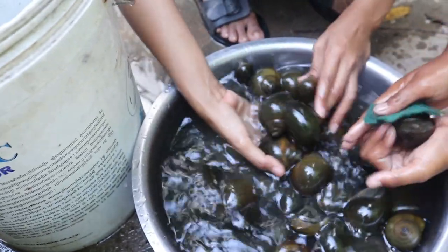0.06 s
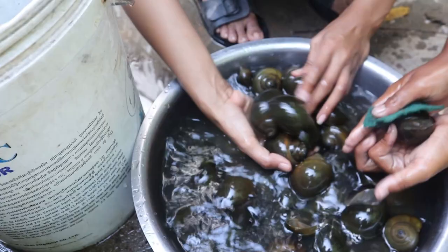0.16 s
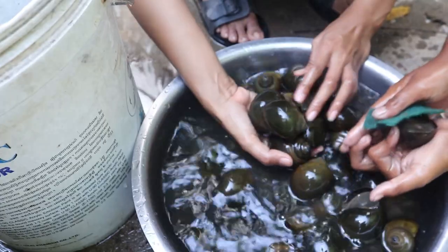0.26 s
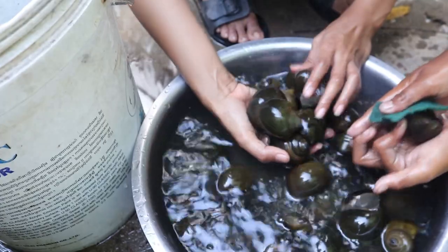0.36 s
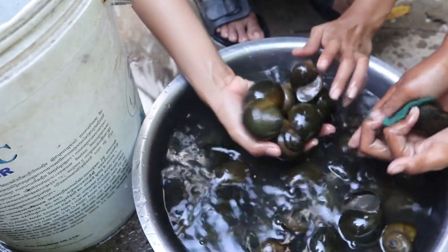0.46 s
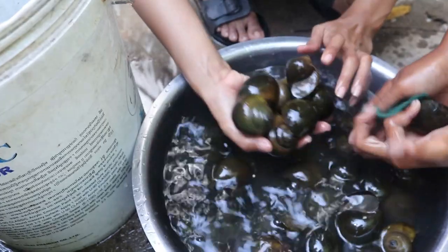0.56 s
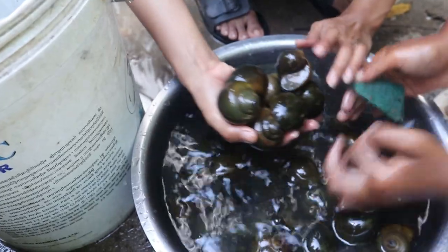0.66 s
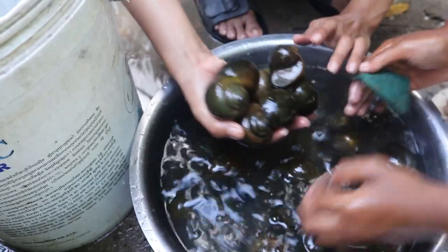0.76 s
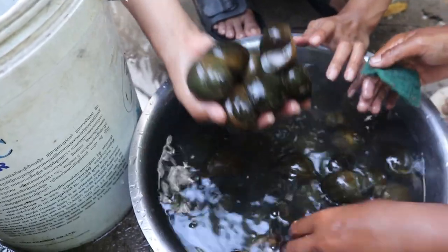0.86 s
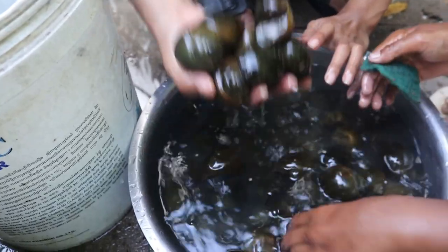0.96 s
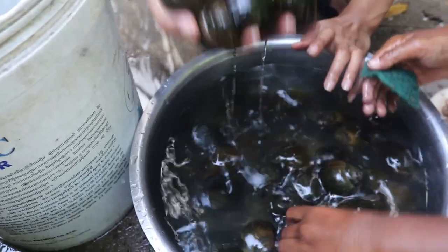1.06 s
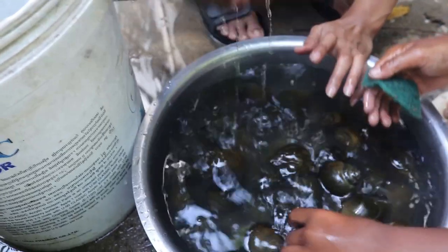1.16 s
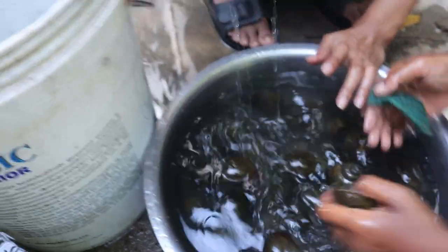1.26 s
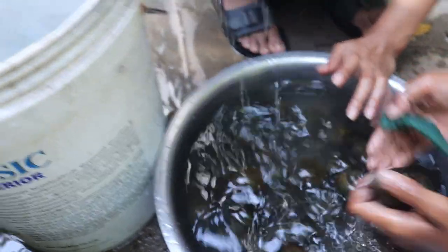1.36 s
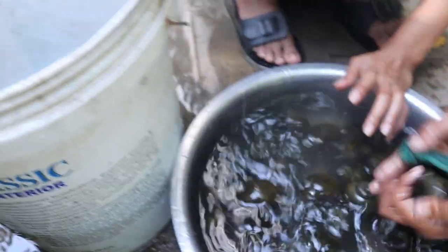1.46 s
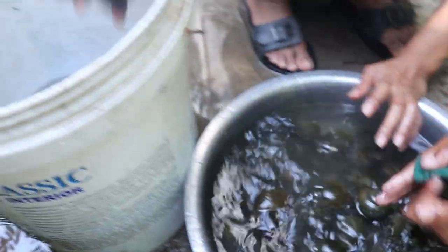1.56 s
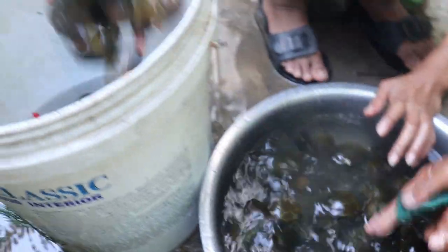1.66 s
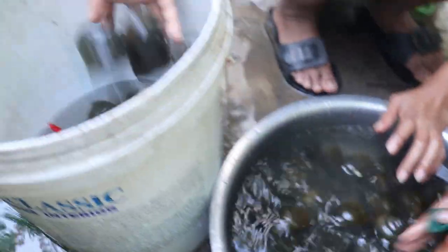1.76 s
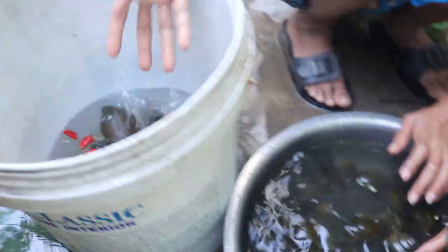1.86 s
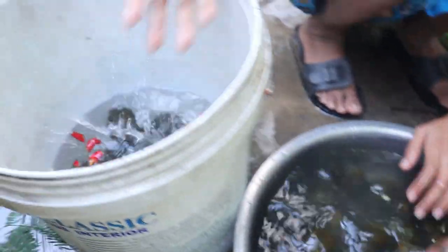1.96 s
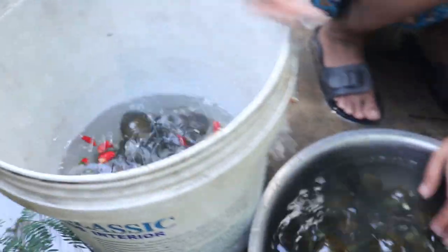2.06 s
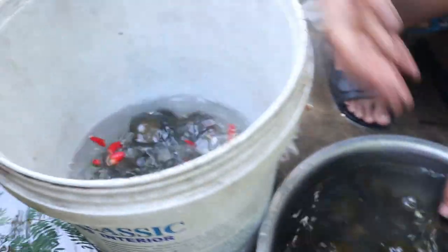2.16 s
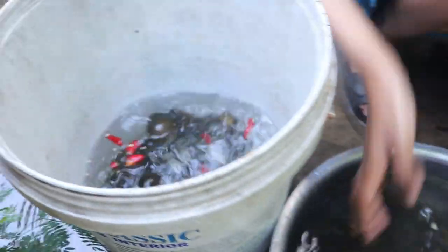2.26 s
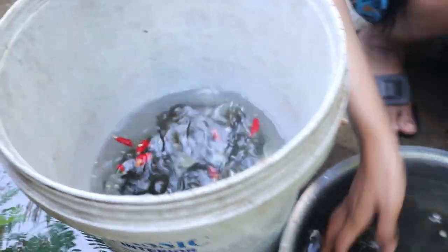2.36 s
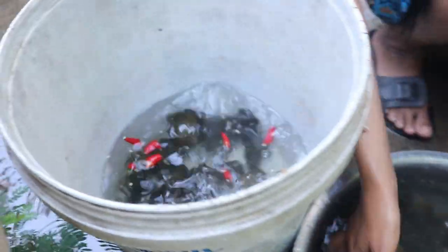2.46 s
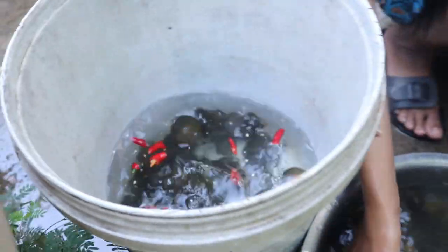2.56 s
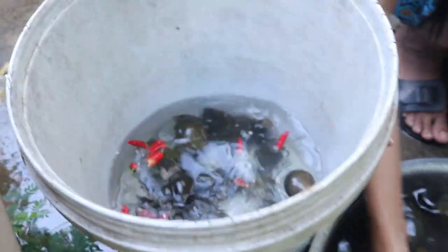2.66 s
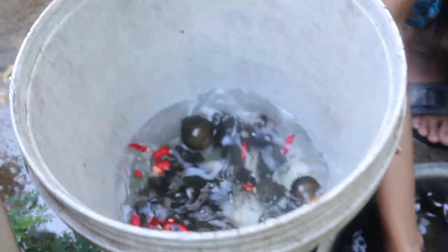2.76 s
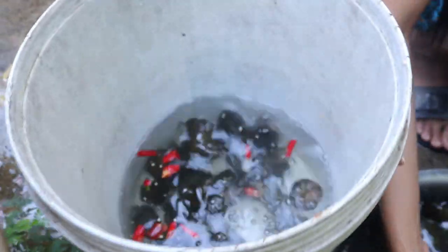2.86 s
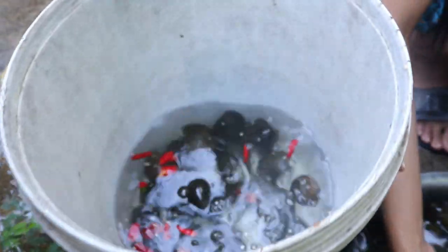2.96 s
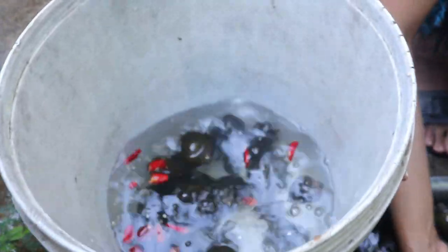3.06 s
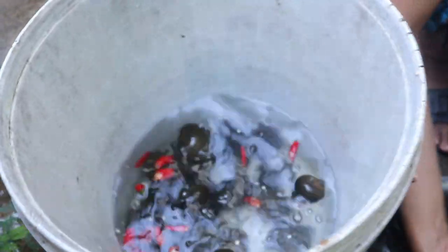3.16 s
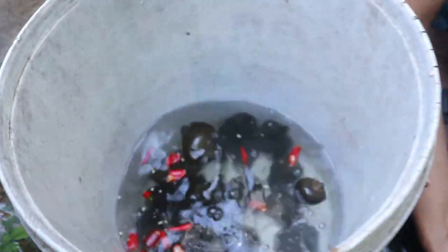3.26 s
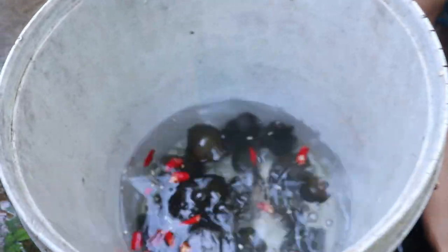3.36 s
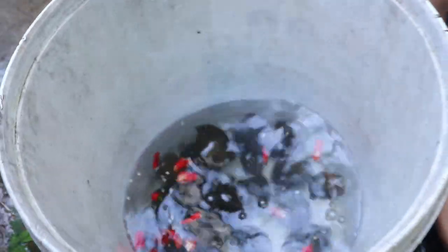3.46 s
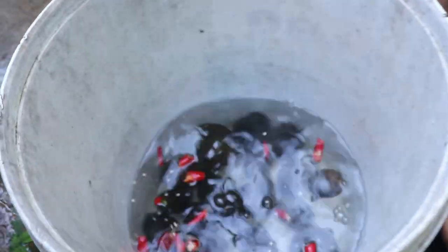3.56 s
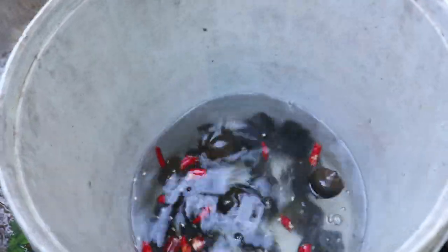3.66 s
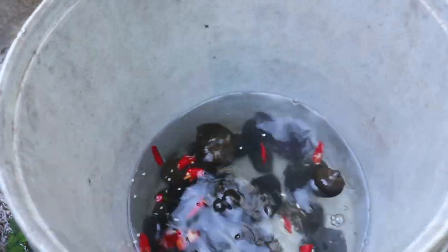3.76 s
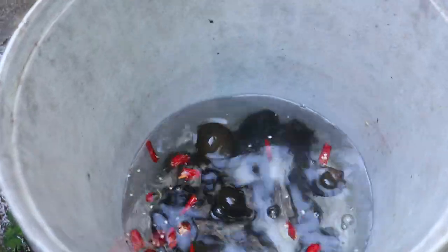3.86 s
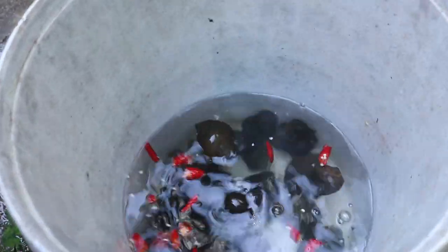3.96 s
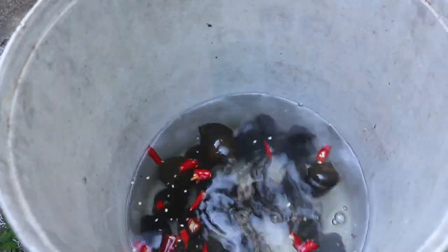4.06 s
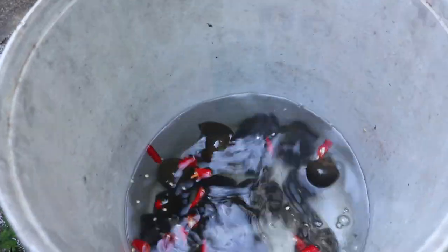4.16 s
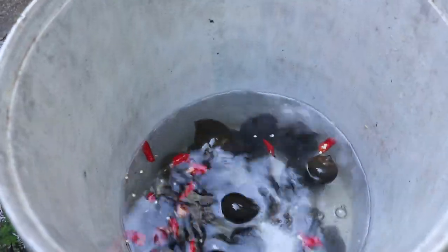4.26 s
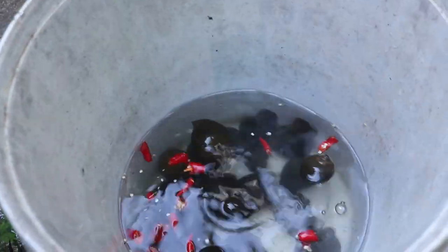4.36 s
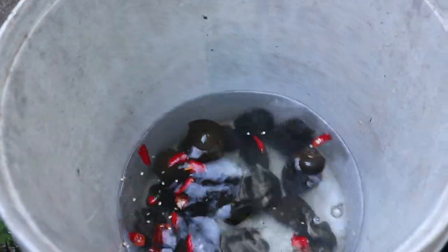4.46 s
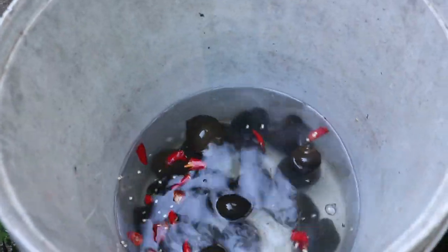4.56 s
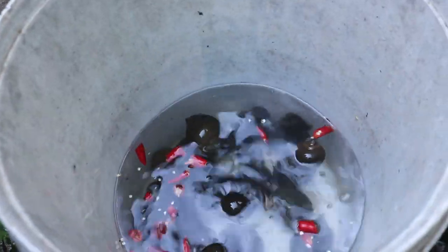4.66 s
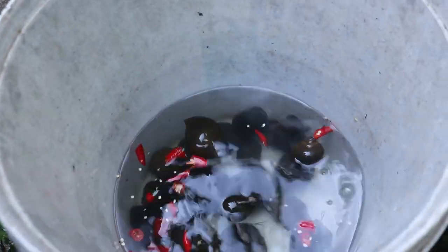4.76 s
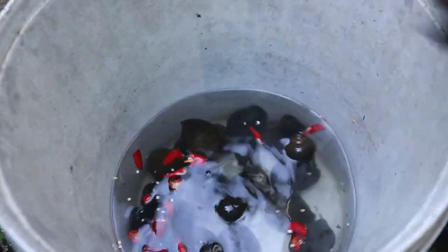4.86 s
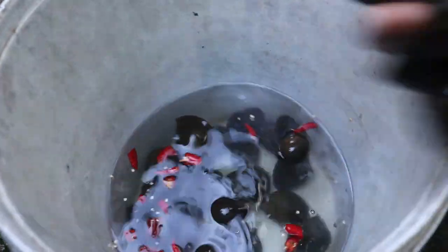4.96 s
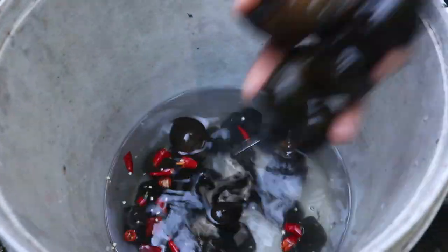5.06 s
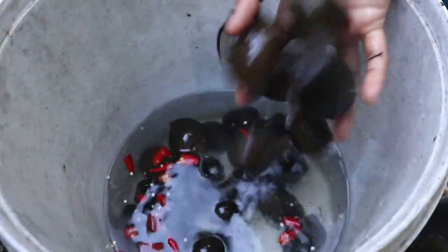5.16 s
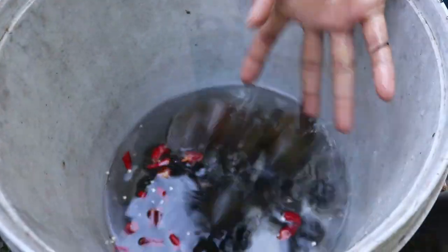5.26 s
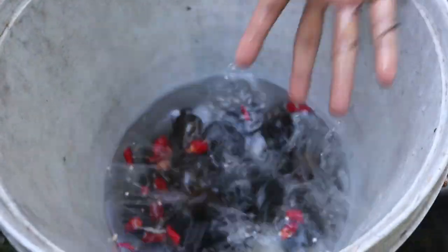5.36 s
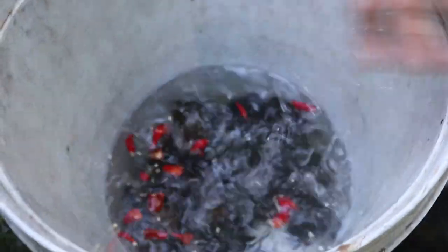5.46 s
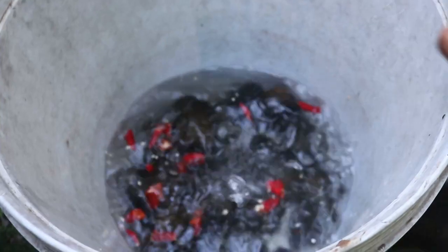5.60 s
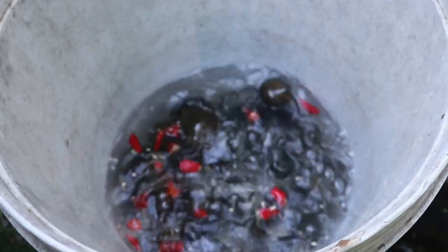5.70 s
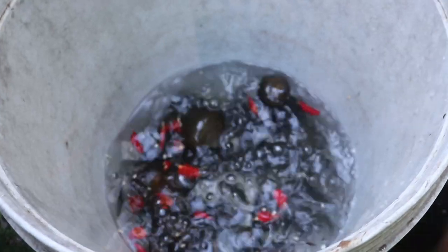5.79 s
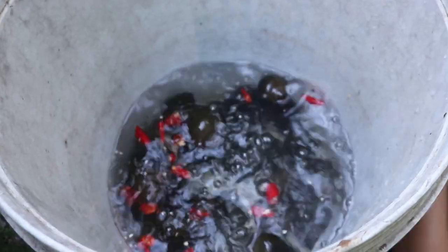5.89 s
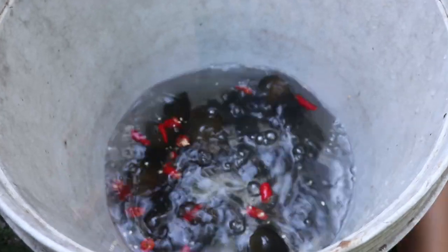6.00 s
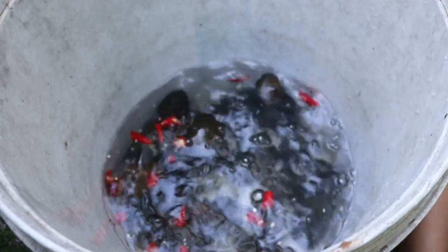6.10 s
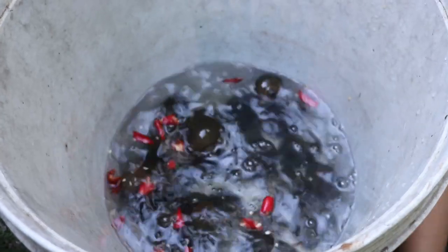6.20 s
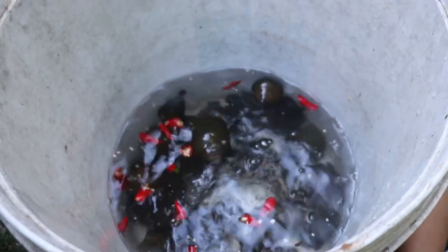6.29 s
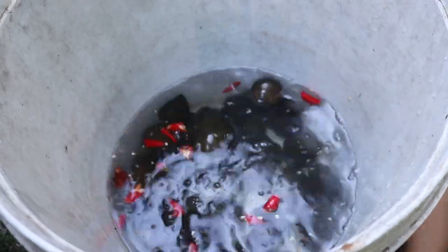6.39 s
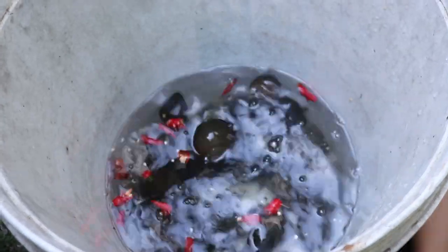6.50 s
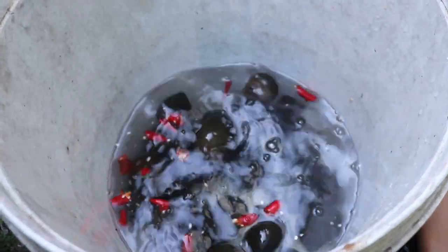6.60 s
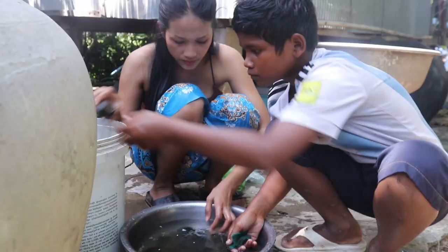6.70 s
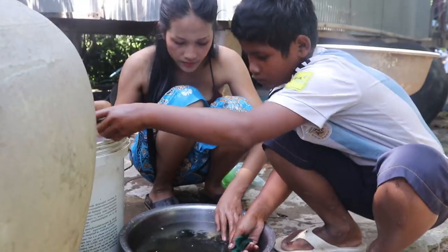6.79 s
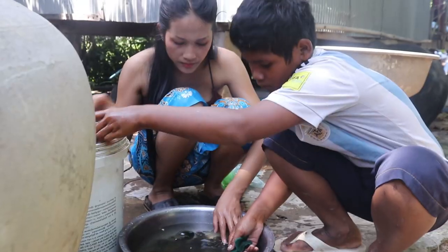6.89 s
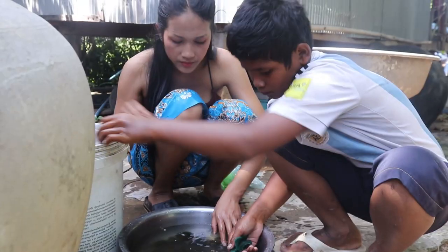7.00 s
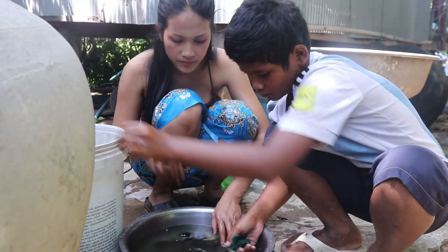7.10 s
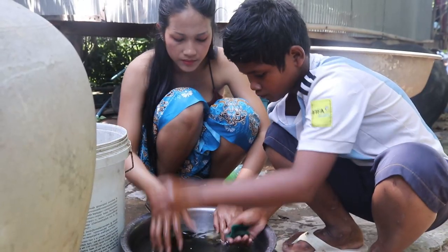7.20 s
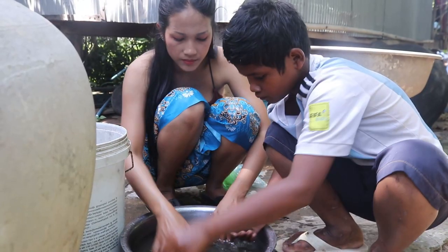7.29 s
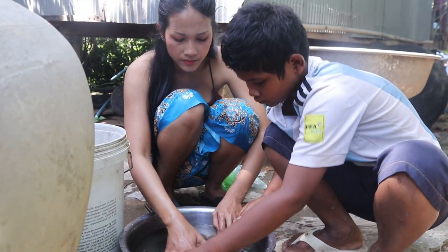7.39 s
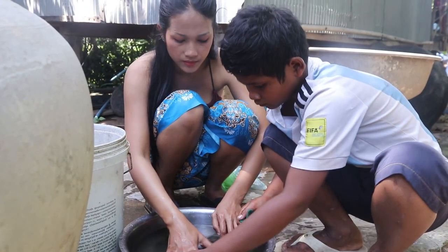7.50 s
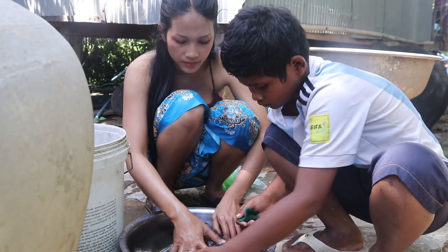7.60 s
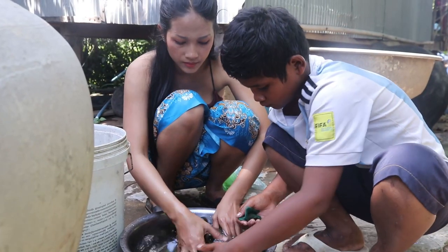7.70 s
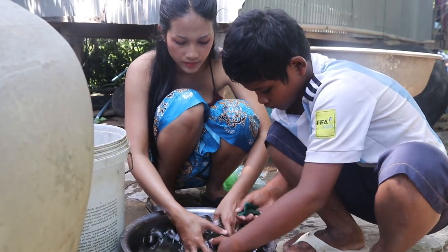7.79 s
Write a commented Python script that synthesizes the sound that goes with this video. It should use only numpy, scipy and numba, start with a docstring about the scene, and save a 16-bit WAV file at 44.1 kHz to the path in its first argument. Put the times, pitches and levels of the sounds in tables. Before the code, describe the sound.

Outdoors, very close, wet snail shells grate and knock in a steel bowl while water sloshes and fizzes. A lifted handful drips, then clatters and splashes into a plastic bucket with a hollow boom. Washing resumes, a second handful plunges in after five seconds, then brief scrubbing, a smaller third drop near seven, and rising grating at the end. Faint low yard rumble lies underneath.

```python
"""Snails are washed by hand in a steel bowl of water, outdoors, close to the microphone.
Shells grind on each other and on the steel, water sloshes and fizzes: showers of tiny damped rings.
Single shells knock: a few short modes over noise bursts. Handfuls dropped into a plastic bucket
splash (bubble and drop rings) and make its air column boom (resonated noise).
Water drains from lifted handfuls, single bubbles chirp, and the yard rumbles faintly."""
import sys
import numpy as np
from scipy import signal
from scipy.fft import rfft, irfft, next_fast_len
from scipy.io import wavfile
from scipy.ndimage import uniform_filter1d, map_coordinates
from numba import njit

SR = 44100
rng = np.random.default_rng(int(sys.argv[2]) if len(sys.argv) > 2 else 0)


def log_audio(samples):
    """Write samples as a 16-bit WAV file to the path given in sys.argv[1]."""
    # one column per channel
    frames = np.atleast_2d(samples).T
    # limit to full scale, then quantise
    limited = np.clip(frames, -1, 1)
    pcm = np.round(limited * 32767).astype(np.int16)
    wavfile.write(sys.argv[1], SR, pcm)


N = 345727
TIME_S = np.arange(N) / SR

# Effort of the hands, one list a bout. Each row: time in seconds, effort in dB before layer trims.
EFFORT_BOUTS = [
    [(0.0, -23), (0.29, -28), (0.36, -30), (0.52, -30.5), (0.62, -28), (0.74, -37.5), (1.2, -32),
     (1.64, -35)],
    [(2.51, -27), (2.72, -24), (3.45, -25.5), (3.9, -28), (4.15, -33.5), (4.5, -35), (4.68, -27),
     (4.88, -37), (5.07, -43.5)],
    [(5.86, -27), (5.98, -37.5), (6.07, -24.5), (6.735, -24)],
    [(6.745, -34.5), (6.85, -36), (6.92, -52.5), (7.07, -49)],
    [(7.425, -31), (7.55, -26.5), (7.84, -18.5)],
]
# Water moved by the hands. Each row: time in seconds, sloshing in dB re effort before layer trims.
WETNESS = [(0.2, -7), (0.65, 3.5), (1.35, 1.5), (2.9, 0.5), (3.45, -1.5), (4.7, 0.5), (6.72, -2.5),
           (6.76, -15), (7.8, -13)]
# Strongest shoves of the pile. Each row: start in seconds, level in dB before layer trims, length in seconds.
SHOVES = [(0.188, -17.5, 0.2), (0.538, -16, 0.058), (0.593, -16, 0.016), (0.65, -14, 0.027),
          (0.954, -19.5, 0.018), (1.225, -17, 0.015), (1.301, -12, 0.03), (1.333, -17.5, 0.022),
          (1.41, -17.5, 0.027), (1.494, -15, 0.052), (2.842, -19.5, 0.031), (3.392, -18, 0.12),
          (3.583, -18, 0.0056), (3.91, -11.5, 0.024), (4.125, -22.5, 0.017), (4.215, -16.5, 0.0081),
          (4.439, -17, 0.03), (4.56, -14, 0.018), (4.625, -20.5, 0.027), (4.779, -14, 0.014),
          (4.945, -14.5, 0.018), (5.013, -23.5, 0.013), (6.875, -26.5, 0.013), (6.941, -32.5, 0.018),
          (7.56, -18, 0.048)]
# Colour of the steel bowl. Each row: frequency in Hz, dB per Hz.
BOWL_COLOUR = [(71, -56), (120, -24), (272, -4.5), (341, -16), (410, -6), (656, -2.5), (757, -2.5),
               (968, 2), (1400, -5.5), (2530, -8.5), (4230, -7.5), (4980, -6.5), (6110, -25.5),
               (13300, -44), (16000, -54)]
# Resonances of the water-filled bowl. Each row: centre in Hz, width in Hz, dB over the direct sound.
BOWL_MODES = [(654.6, 17, 3), (990, 130, -40), (1263, 8.5, 6.5), (2503, 160, -5), (3740, 53, 2),
              (5220, 200, -5.5)]
# The microphone moves over the bucket and away. Each row: time in seconds, low heave in dB re sloshing,
# left minus right of the bowl in dB, lag of the left port in ms.
OVER_BUCKET = [(1.5, -36, 5.5, 0.067), (2.6, -10, 1.5, 0.12), (6.7, -7.5, 0.5, 0.11), (7.4, -5, 4, -0.04)]
# Colour of the two microphone ports. Each row: frequency in Hz, left in dB, right in dB.
PORT_COLOUR = [(248, -7.5, -6.5), (667, -3, -0.5), (1236, -4.5, -3.5), (2220, -1, 8.5), (3940, -4.5, 4.5),
               (8100, 0, 5.5), (14000, 7.5, 5.5)]
# Loudest shell knocks. Each row: time in seconds, level in dB, ring pitch in Hz,
# thud and crack in dB re that level, before their trims.
KNOCKS = [(0.268, -1.5, 3070, -28, -37), (0.289, 1, 3290, -29, -26), (0.315, -12, 3580, -20, -13),
          (0.413, -5.5, 2510, -40, -16), (0.852, -11, 5300, -17, 7), (0.929, 0, 1210, -24, -30),
          (1.478, -13, 640, -5.5, -10), (1.661, 10.5, 2040, -22, -38), (1.717, -5, 2010, -32, -15.5),
          (1.777, -13, 2310, -35, -19), (1.843, 3, 1930, -23.5, -22), (1.907, 6, 1870, -14, -22.5),
          (1.954, -3, 1450, -37, -9), (1.986, -9, 2880, -17, -10.5), (2.063, 0.5, 1790, -16, -24),
          (2.201, -10, 770, -15, -42), (2.23, -9.5, 1170, -11.5, -48), (2.315, -11.5, 595, -10.5, -25),
          (2.441, -13, 830, -21, -33), (2.59, -5.5, 2520, -37, -28), (3.499, -3.5, 1130, -21, -25),
          (3.734, -7.5, 3350, -36, -18), (3.767, -12.5, 690, -28, -4.5), (3.837, -10, 910, -22, -29),
          (3.894, -14, 2430, -31, -8), (3.939, -8, 925, -31, -29), (4.208, -8.5, 2800, -48, -24),
          (4.248, 2, 680, -23, -25), (4.289, 0.5, 1030, -21, -20.5), (4.329, -5.5, 1950, -20, -40),
          (4.536, -2.5, 624, -9, -11.5), (5.34, -2, 2260, -21, -9), (5.408, -5, 895, -13, -15),
          (5.414, 2.5, 2560, -30, -18), (5.431, -12.5, 403, 0, -1), (5.465, -6, 4700, -24, -23),
          (5.482, -7.5, 1290, -32, -12), (5.515, -5, 1420, -36, -39), (5.551, -5.5, 1510, -35, -23),
          (5.69, -8.5, 2620, -28, -26), (6.654, -7, 1080, -34, -21), (7.08, -16, 1050, -19, -25),
          (7.097, -7, 1290, -21, -33), (7.115, -14.5, 1240, -7, -33), (7.136, -5, 1770, -28, -48),
          (7.193, -8, 1765, -18, -40), (7.456, -2, 2540, -32, -39)]
# Modes of a wet shell. Each row: multiple of its ring pitch, level in dB, T60 in seconds.
SHELL_MODES = [(.56, -16, .014), (.77, -11, .022), (1, -5, .026), (1.19, -12, .015), (1.62, -19, .012)]
# Handfuls dropped in the bucket. Each row: entry, collapse and rebound in seconds, strength in dB,
# settling time as a multiple, extra air column in dB, extra splatter in dB.
HANDFULS = [(1.911, 1.998, 2.2, -4, 1.2, 0.5, -5.5), (5.432, 5.459, 5.712, -4.5, 1.05, 0.5, -1.5),
            (7.11, 7.164, 7.345, -8.5, 0.6, -2.5, -2.5)]
# Stages of a splash: shells enter, their hollow collapses, water rebounds. Each row: rise in seconds,
# decay in seconds before the settling multiple, bubbling, air column and splatter in dB before trims.
SPLASH_STAGES = [(0.004, 0.07, -29, -16.5, -27.5), (0.036, 0.12, -20.5, -22, -26.5),
                 (0.004, 0.16, -27, -28.5, -37.5)]
# Colour of the plastic bucket. Each row: frequency in Hz, dB per Hz.
BUCKET_COLOUR = [(53, -55), (90, -6), (284, 2.5), (429, -1.5), (721, -0.5), (786, 2), (1070, -4.5),
                 (1910, -7), (2830, -17), (4170, -19.5), (9930, -27.5), (16000, -37)]
# Single bubbles. Each row: start in seconds, start pitch in Hz, peak in dB, length in seconds,
# pitch rise in octaves.
BUBBLES = [(0.203, 896, -17, 0.018, 0.25), (0.44, 896, -18.5, 0.017, 0.24), (4.663, 973, -19, 0.039, .3),
           (5.401, 2840, -18, 0.012, .1), (5.7, 4520, -25, 0.012, 0.34), (5.799, 2180, -27, 0.02, 0.31),
           (5.825, 2220, -22, 0.014, 0.13), (7.093, 1241, -20.5, 0.045, 0.082),
           (7.138, 3490, -17.5, 0.011, 0.067), (7.236, 610, -24.5, .064, 1.0),
           (7.271, 2000, -25.5, 0.0105, 0.44)]
# Water running out of lifted handfuls. Each row: start in seconds, end in seconds, level in dB.
DRAINING = [(0.88, 0.997, -34), (1.787, 1.912, -28), (5.087, 5.446, -33)]
# Colour of the running water. Each row: frequency in Hz, dB per Hz.
TRICKLE_COLOUR = [(200, -10), (700, -2), (2800, 1.5), (5000, -3), (7000, -9.5), (11000, -10), (16000, -22)]
# Colour of the yard air. Each row: frequency in Hz, dB per Hz.
YARD_COLOUR = [(15, -34), (25, -6), (48, -5.5), (102, -8), (175, -5.5), (427, -13), (714, -11.5),
               (4030, -19.5), (4370, -17), (6050, -24.5), (16000, -37.5)]

SPRAY_RE_EFFORT_DB = -6.5
# lighter knocks: level re effort, scatter either way, middle ring pitch
STRAY_RE_EFFORT_DB, STRAY_SCATTER_DB, STRAY_HZ = 12.5, 3, 1700
KNOCK_PAN_DB = -3.5  # left minus right in the bowl; bucket knocks are central
BEFORE_ENTRY_S, AFTER_ENTRY_S = 0.3, 0.55  # knocks this close to a handful's entry are in the bucket
AIR_HZ, AIR_WIDTH_HZ = 277.5, 20  # the bucket's air column
SPLATTER_LIFE = 0.78  # share of a stage's decay time for which drops fly
PLOP_DB = -1.5  # sparse, longer-ringing bubbles re the bubbling
YARD_DB = -45
TOP_HZ = 16000


def undb(db):
    """Decibels to gain."""
    return 10 ** (np.asarray(db) / 20)


def unit(x):
    """Scale so that the mean of the channels has rms 1."""
    return x / np.sqrt(np.mean(x.mean(0) ** 2))


def band(x, lo_hz, hi_hz, order=2):
    """Butterworth band-pass."""
    sos = signal.butter(order, [lo_hz, min(hi_hz, .45 * SR)], "band", fs=SR, output="sos")
    return signal.sosfilt(sos, x)


def resonate(x, hz, width_hz):
    """One resonance, gain 1 at its centre."""
    return signal.lfilter(*signal.iirpeak(hz, hz / width_hz, fs=SR), x)


def colour(x, points):
    """Filter by (Hz, dB) points; two dB columns colour left and right apart."""
    hz, *columns = np.transpose(points)
    size = next_fast_len(N)
    log_hz = np.log(np.arange(size // 2 + 1) * SR / size + 1)
    response = undb([np.interp(log_hz, np.log(hz), db) for db in columns])
    return irfft(rfft(x, size) * response, size)[:, :N]


def gains(bouts, edge_s):
    """A gain curve for each dB column, silent between the bouts, edges smoothed over edge_s."""
    total = 0
    for rows in bouts:
        s, *columns = np.transpose(rows)
        active = (TIME_S >= s[0]) & (TIME_S <= s[-1])
        total = total + undb([np.interp(TIME_S, s, db) for db in columns]) * active
    return uniform_filter1d(total, int(edge_s * SR), axis=1)


def walk(rate_hz):
    """Random curve of spread 1, a new target rate_hz times a second."""
    steps = rng.standard_normal(2048)
    return np.interp(TIME_S * rate_hz, np.arange(len(steps)), steps) * np.sqrt(3 / 2)


def jolts(fall_s, spread_db, steady, count):
    """Stick and slip: a gain of rms 1 that jumps at random moments and falls back over fall_s."""
    when, rank = rng.random((count, 2)).T
    kick_power = undb(-spread_db * np.log(rank + .015)) ** 2
    kicks = np.bincount((when * (N - 1)).astype(int), kick_power, N)
    power = signal.lfilter([1], [1, -np.exp(-2 / (fall_s * SR))], kicks)
    share = np.clip(steady, 0, 1)
    return np.sqrt(share + (1 - share) * power / power.mean())


@njit
def rings(start_s, hz, cycles, size, rise, twist_rad):
    """Damped sines that fall 60 dB in `cycles`, gliding up by `rise`; left lags by twist_rad."""
    out = np.zeros((2, N))
    for k in range(len(start_s)):
        first, length = int(start_s[k] * SR), int(cycles[k] * SR / hz[k]) + 1
        turn = 2 * np.pi * hz[k] / SR
        z, pole = size[k] + 0j, np.exp(1j * turn - np.log(1000) / length)
        glide, late = np.exp(1j * turn * rise / length), np.exp(-1j * twist_rad[k])
        for i in range(max(first, 0), min(first + length, N)):
            out[0, i] += (z * late).imag * min((i - first) * turn / 2, 1.)
            out[1, i] += z.imag
            z *= pole
            pole *= glide
    return out


def shower(lo_hz, hi_hz, cycles, spread_db, rise, lag_ms, count):
    """Many tiny rings of random time, pitch, size and damping; size grows with pitch."""
    when, pitch, rank, damping, place = rng.random((count, 5)).T
    hz = lo_hz * (min(hi_hz, .4 * SR) / lo_hz) ** pitch
    size = hz * undb(-spread_db * np.log(rank + 0.064))
    # reflections scramble the phase between the ports, the more the shorter the wave
    scramble_rad = (2 * place - 1) * np.minimum(hz / 900, 1.7)
    twist_rad = 2 * np.pi * hz * lag_ms / 1000 + scramble_rad
    return rings(when * TIME_S[-1], hz, cycles * (.5 + damping), size, rise, twist_rad)


def washing():
    """Shells grind, small bubbles slosh and spray fizzes, all jerking together with the hands."""
    effort, = gains(EFFORT_BOUTS, edge_s=.004)
    grind_gain = effort * undb(1.8 * walk(25))
    slosh_gain = grind_gain * undb(np.interp(TIME_S, *np.transpose(WETNESS)))
    spray_gain = grind_gain * undb(SPRAY_RE_EFFORT_DB)
    shove = shoves(rise_s=.0015, settle_s=.03, settle_db=-14)
    grind = in_bowl(shower(1350, 5700, cycles=30, spread_db=3.1, rise=0., lag_ms=0., count=30000))
    slosh = in_bowl(shower(330, 1400, cycles=15, spread_db=2.8, rise=.18, lag_ms=0., count=7000))
    spray = in_bowl(shower(5700, 16000, cycles=45, spread_db=1.5, rise=0., lag_ms=0., count=45000))
    # each slip of one shell on another is a tick through all bands
    slip = jolts(fall_s=.008, spread_db=2.7, steady=.55, count=600)
    sound = grind * np.hypot(undb(-2.0) * grind_gain * slip, undb(-11.5) * shove)
    sound += slosh * np.hypot(undb(2.0) * slosh_gain * slip ** 0.59, undb(-13.5) * shove)
    sound += spray * np.hypot(spray_gain * slip ** 0.54, undb(-11.5) * shove)
    s, *columns = np.transpose(OVER_BUCKET)
    heave_db, pan_db, lag_ms = (np.interp(TIME_S, s, column) for column in columns)
    low = heave() * slosh_gain * undb(heave_db)
    left = map_coordinates(sound[0], [(TIME_S - lag_ms / 1000) * SR], mode="mirror")
    return np.array([left, sound[1]]) * undb(np.outer([.5, -.5], pan_db)) + low


def shoves(rise_s, settle_s, settle_db):
    """Each shove sets the pile grating at once; it then settles more quietly."""
    total = np.zeros(N)
    for s, db, length_s in SHOVES:
        first = int(s * SR)
        age_s = np.maximum(TIME_S[first:][:SR // 4] - s, 0)
        fade = np.exp(-(age_s / length_s) ** 2) + undb(settle_db) * np.exp(-age_s / settle_s)
        total[first:][:len(age_s)] += undb(db) * np.minimum(age_s / rise_s, 1) * fade
    return total


def in_bowl(x):
    """The steel bowl adds its resonances and colour."""
    modes = sum(undb(db) * resonate(x, hz, width_hz) for hz, width_hz, db in BOWL_MODES)
    return unit(colour(x + modes, BOWL_COLOUR))


def heave():
    """Heaving water: soft low noise that the air column of the bucket beside the bowl answers."""
    noise = band(rng.standard_normal(N), 176, 270)
    return unit((noise + undb(17) * resonate(noise, AIR_HZ, AIR_WIDTH_HZ))[None])


def knocks(delay_s=.002, body_db=-15, thud_trim_db=1, crack_trim_db=-3):
    """A hollow shell rings for a few cycles over a thud in the water and a bright crack."""
    out, age_s = np.zeros((2, N + SR)), np.arange(4096) / SR
    onset = 1 - np.exp(-age_s / .0005)
    for s, db, hz, thud_db, crack_db in KNOCKS + stray_knocks(thud_db=-23, crack_db=-16, count=60):
        hit = undb(body_db) * burst(.6 * hz, 1.8 * hz, hold_s=.003, t60_s=.018, apart=.5)
        chances = rng.standard_normal((len(SHELL_MODES), 2))
        for (ratio, mode_db, t60_s), (shape, place) in zip(SHELL_MODES, chances):
            mode_hz = hz * ratio * np.exp(0.039 * shape)  # no two shells are alike
            twist_rad = np.array([[min(mode_hz / 2200, 1) * place], [0]])
            tone = np.sin(2 * np.pi * mode_hz * age_s - twist_rad)
            hit += undb(mode_db) * tone * np.exp(-np.log(1000) * age_s / t60_s) * onset
        thud = burst(320, 1350, hold_s=.003, t60_s=0.015, apart=0.054)
        hit += undb(thud_db + thud_trim_db) * thud
        crack = burst(2000, 12000, hold_s=.002, t60_s=.018, apart=.9)
        hit += undb(crack_db + crack_trim_db) * crack
        in_bucket = any(-BEFORE_ENTRY_S < s - entry_s < AFTER_ENTRY_S for entry_s, *_ in HANDFULS)
        pan_db = 0 if in_bucket else KNOCK_PAN_DB
        level = undb(db + pan_db * np.array([[.5], [-.5]]))
        out[:, int((s + delay_s) * SR):][:, :len(age_s)] += hit * level
    # shells are too small to radiate bass
    return band(out[:, :N], 200, 18000)


def stray_knocks(thud_db, crack_db, count):
    """Rows of light knocks at random moments of the washing, following the hands' effort."""
    effort, = gains(EFFORT_BOUTS, edge_s=.004)
    rows = []
    for when, strength, pitch in rng.random((count, 3)):
        at = int(when * (N - 1))
        if effort[at] > undb(-60):
            scatter_db = STRAY_SCATTER_DB * (2 * strength - 1)
            db = 20 * np.log10(effort[at]) + STRAY_RE_EFFORT_DB + scatter_db
            rows.append((TIME_S[at], db, STRAY_HZ * 2 ** (2 * pitch - 1), thud_db, crack_db))
    return rows


def burst(lo_hz, hi_hz, hold_s, t60_s, apart):
    """Contact noise: holds while shells crush together, then dies; `apart` is the ports' unlikeness."""
    age_s = np.arange(4096) / SR
    mid, side = rng.standard_normal((2, len(age_s)))
    fade = np.exp(-np.log(1000) * np.maximum(age_s - hold_s, 0) / t60_s)
    x = band((mid + apart * np.outer([1, -1], side)) * fade, lo_hz, hi_hz)
    return x / np.sqrt(np.sum(x ** 2) / (SR / 100))  # energy of 10 ms at level 1, both ports summed


def walls(x, t60_s, wet_db):
    """Sound rattles briefly between vessel walls and ground: a short band-limited noise echo."""
    age_s = np.arange(8192) / SR
    echo = band(rng.standard_normal((2, len(age_s))), 520, 2300, order=1)
    echo = echo * np.exp(-np.log(1000) * age_s / t60_s) * (age_s > .005)
    echo = echo / np.sqrt(np.sum(echo ** 2) / 2)
    return x + undb(wet_db) * signal.fftconvolve(x, echo, axes=1)[:, :N]


def plunges():
    """Shells sinking in the bucket trap rising bubbles and throw drops; the air above booms."""
    bubble_gain, air_gain, splatter_gain = splashes()
    bubbles = shower(360, 2600, cycles=26, spread_db=3.2, rise=.17, lag_ms=-.04, count=9000)
    bubbles = unit(band(colour(bubbles, BUCKET_COLOUR), 166, 6300))
    plops = shower(450, 3600, cycles=52, spread_db=3.0, rise=.28, lag_ms=-.04, count=650)
    bubbles = bubbles + undb(PLOP_DB) * unit(colour(plops, BUCKET_COLOUR))
    splatter = shower(2200, 16000, cycles=32, spread_db=2.9, rise=.03, lag_ms=-.05, count=40000)
    splatter = unit(band(colour(splatter, BUCKET_COLOUR), 340, 14000))
    churn = band(rng.standard_normal(N), 146, 380)
    air = unit((churn + undb(12.0) * resonate(churn, AIR_HZ, AIR_WIDTH_HZ))[None])
    # the water closes over each shell with a slap
    slap = jolts(fall_s=.009, spread_db=2.5, steady=.25, count=450)
    sound = undb(2.0) * bubbles * bubble_gain * slap ** 0.82
    sound = sound + undb(9.0) * splatter * splatter_gain * slap
    return sound + undb(1.5) * air * air_gain


def splashes():
    """Gains of bubbling, air column and splatter: each stage of a splash swells and dies away."""
    power = np.zeros((3, N))
    for *times_s, strength_db, settling, air_db, splatter_db in HANDFULS:
        for s, (rise_s, decay_s, *layers_db) in zip(times_s, SPLASH_STAGES):
            first = int(s * SR)
            age_s = TIME_S[first:][:SR] - TIME_S[first]
            size = undb(strength_db) * undb(layers_db) * undb([0, air_db, splatter_db])
            life_s = decay_s * settling * np.array([[1], [1], [SPLATTER_LIFE]])
            swell = np.minimum(age_s / rise_s, 1) * np.exp(-np.maximum(age_s - rise_s, 0) / life_s)
            power[:, first:][:, :len(age_s)] += (size[:, None] * swell) ** 2
    return np.sqrt(power)


def single_bubbles():
    """A bubble swells, rings and rises in pitch as it nears the surface."""
    out = np.zeros(N)
    for s, hz, db, length_s, octaves in BUBBLES:
        life = np.linspace(0, 1, int(length_s * SR))
        tone = np.sin(2 * np.pi * np.cumsum(hz * 2 ** (octaves * life)) / SR)
        out[int(s * SR):][:len(life)] += undb(db) * tone * np.sin(np.pi * life ** 0.98)
    return out


def draining():
    """Water runs from between the fingers in a fine, uneven patter."""
    flow, = gains([[(start_s, db), (end_s, db)] for start_s, end_s, db in DRAINING], edge_s=.006)
    patter = shower(400, 16000, cycles=36, spread_db=1.5, rise=0., lag_ms=.02, count=70000)
    unevenness = jolts(fall_s=.008, spread_db=2.7, steady=.4, count=400)
    return unit(colour(patter, TRICKLE_COLOUR)) * flow * unevenness


def yard():
    """Faint outdoor air with a low rumble: coloured noise of wandering level."""
    mid, side = rng.standard_normal((2, N))
    air = unit(colour(mid + 0.23 * np.outer([1, -1], side), YARD_COLOUR))
    return undb(YARD_DB) * air * undb(2.0 * walk(8.2))


def scene():
    """Bowl, bucket and knocking shells in the yard."""
    clacks = walls(knocks(), t60_s=.09, wet_db=-22)
    bowl = colour(washing(), PORT_COLOUR)
    return bowl + draining() + plunges() + single_bubbles() + clacks + yard()


def record(dry):
    """Peaks over full scale clip; the band above TOP_HZ is cut."""
    clipped = np.clip(dry, -1, 1)
    return signal.sosfilt(signal.ellip(8, .2, 70, TOP_HZ, fs=SR, output="sos"), clipped)


dry = scene()
out = record(dry)
log_audio(out)
```